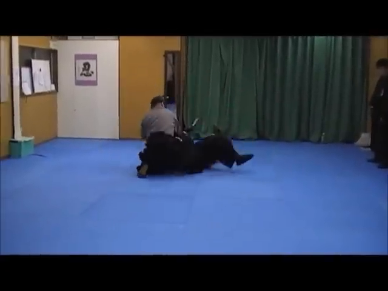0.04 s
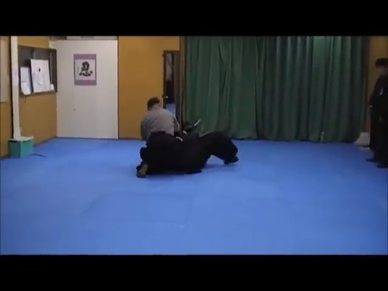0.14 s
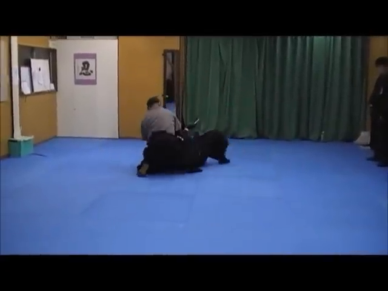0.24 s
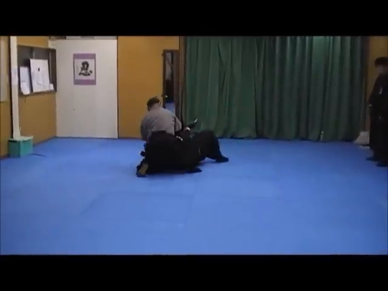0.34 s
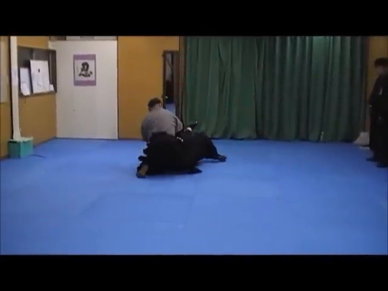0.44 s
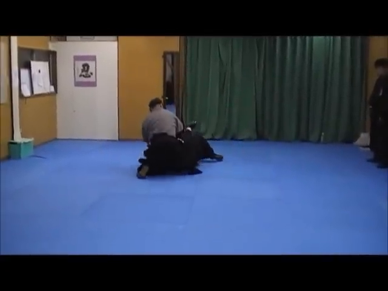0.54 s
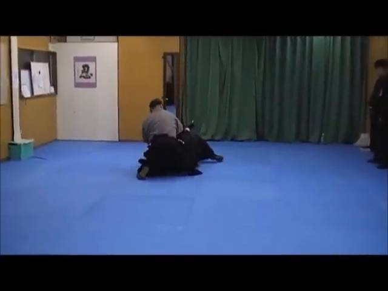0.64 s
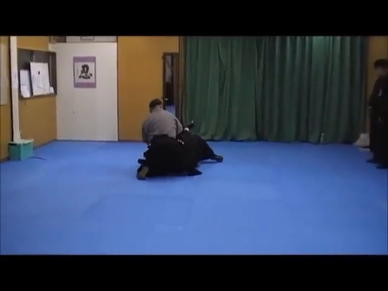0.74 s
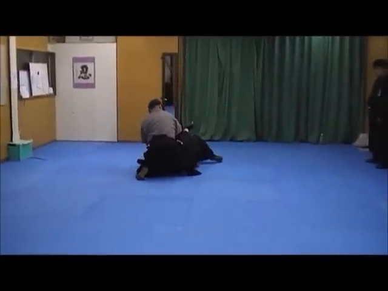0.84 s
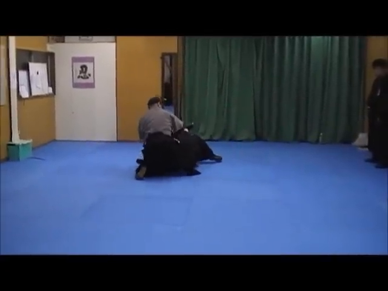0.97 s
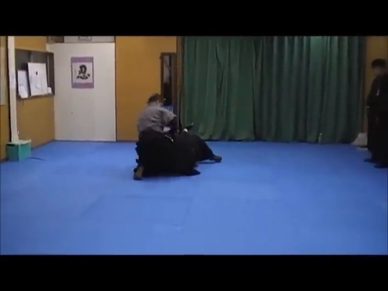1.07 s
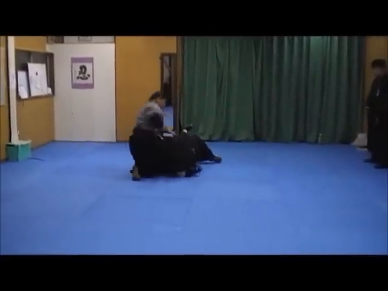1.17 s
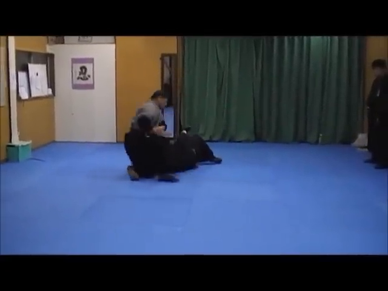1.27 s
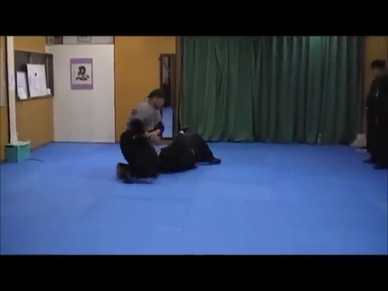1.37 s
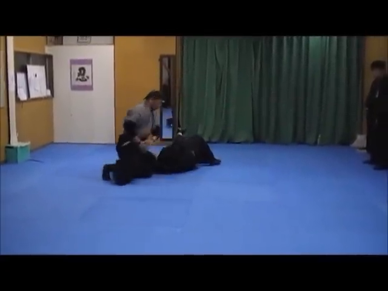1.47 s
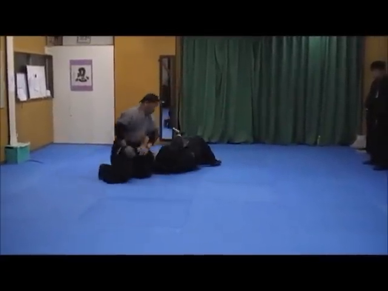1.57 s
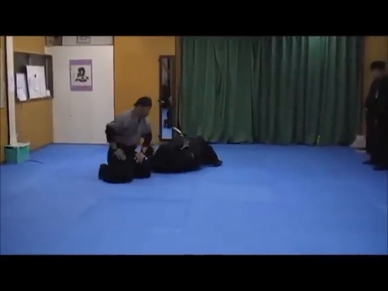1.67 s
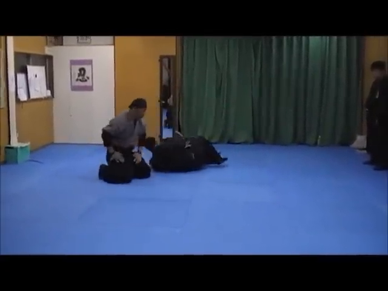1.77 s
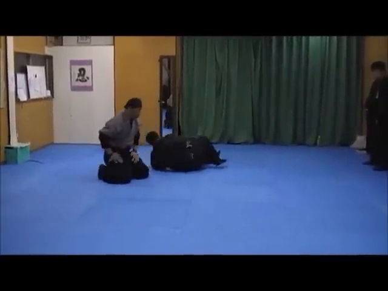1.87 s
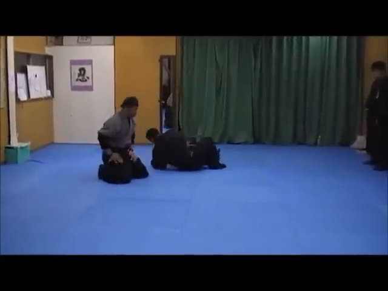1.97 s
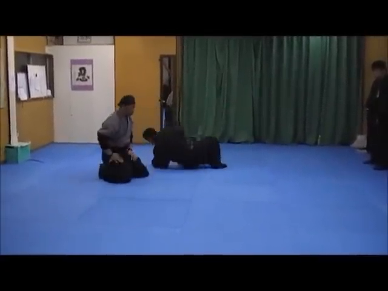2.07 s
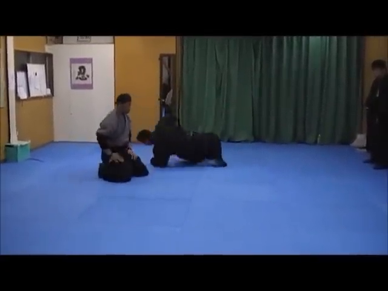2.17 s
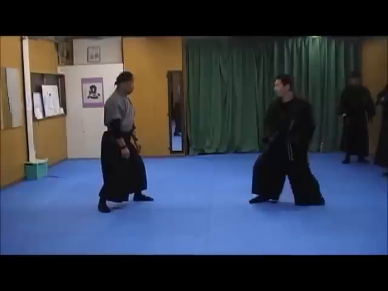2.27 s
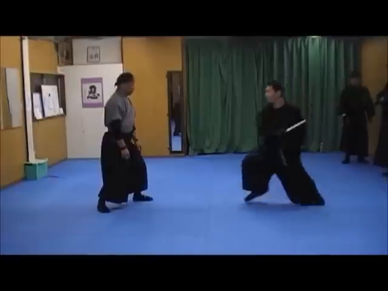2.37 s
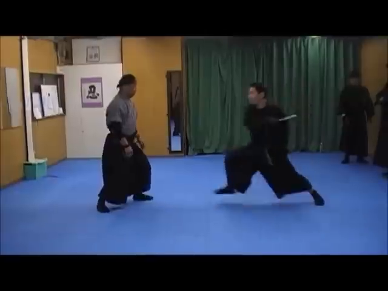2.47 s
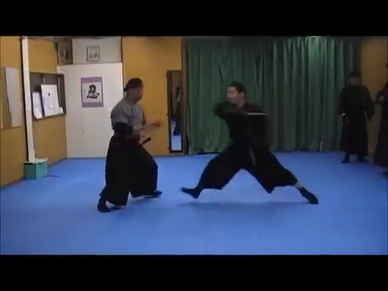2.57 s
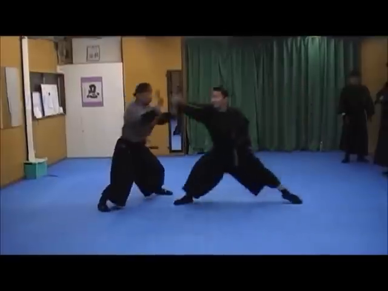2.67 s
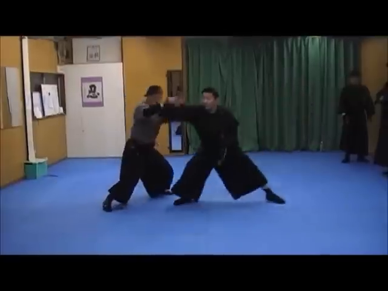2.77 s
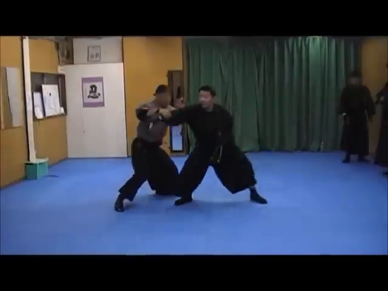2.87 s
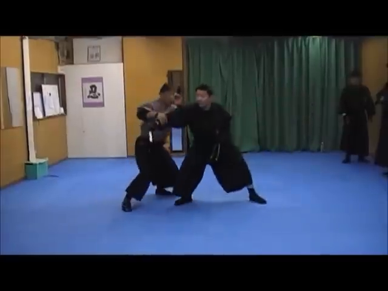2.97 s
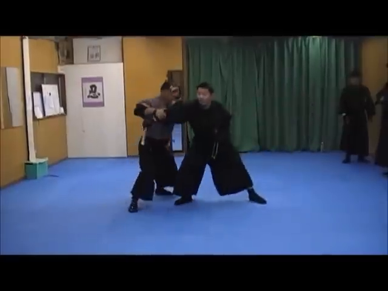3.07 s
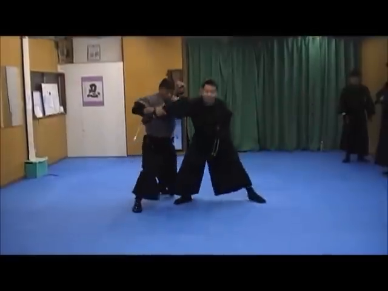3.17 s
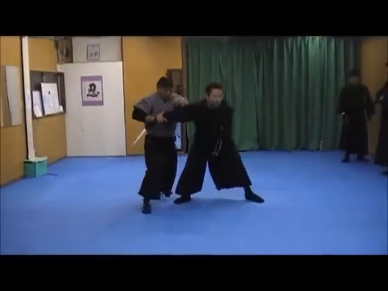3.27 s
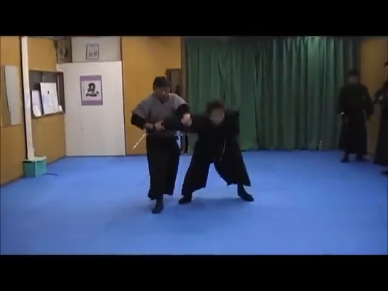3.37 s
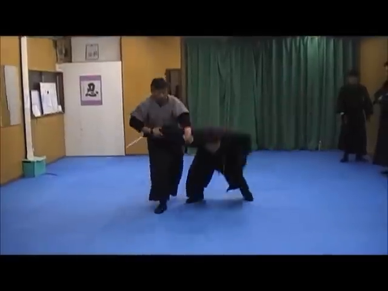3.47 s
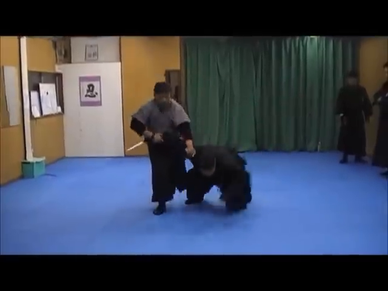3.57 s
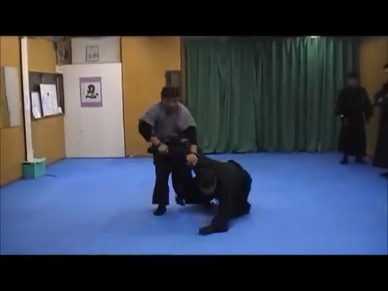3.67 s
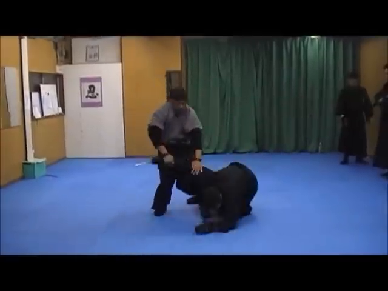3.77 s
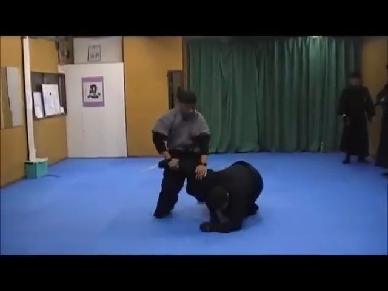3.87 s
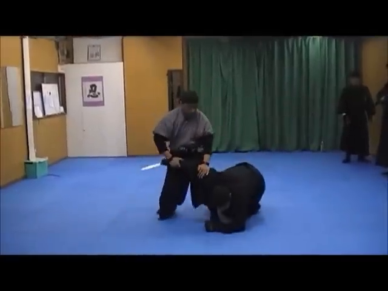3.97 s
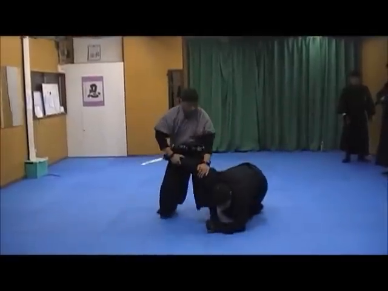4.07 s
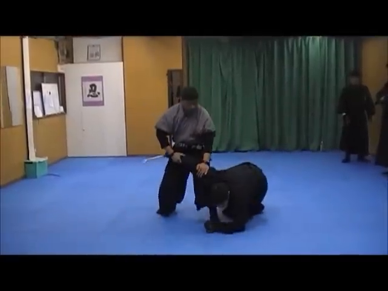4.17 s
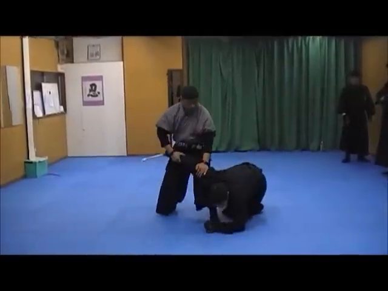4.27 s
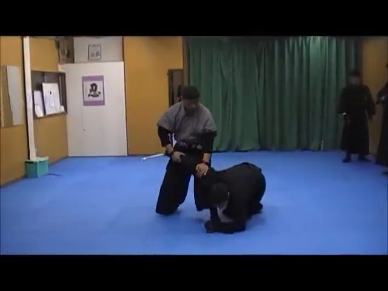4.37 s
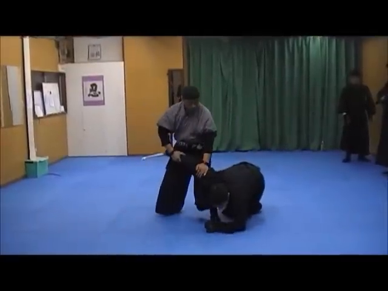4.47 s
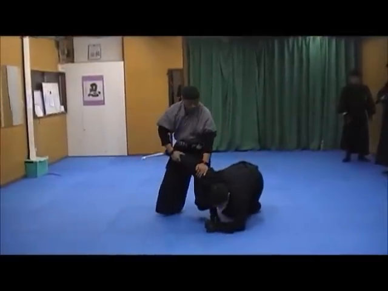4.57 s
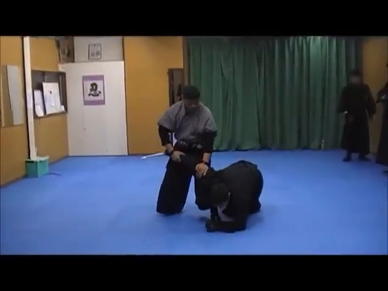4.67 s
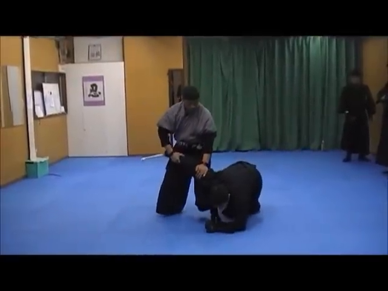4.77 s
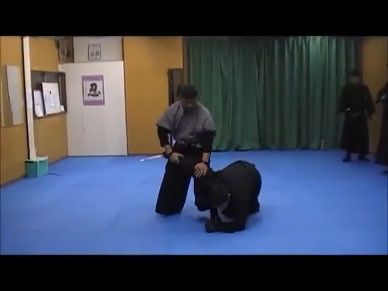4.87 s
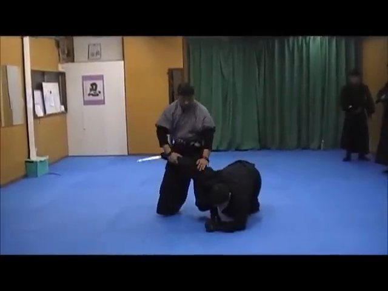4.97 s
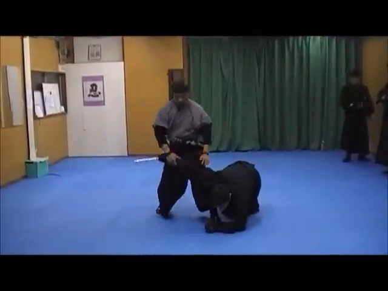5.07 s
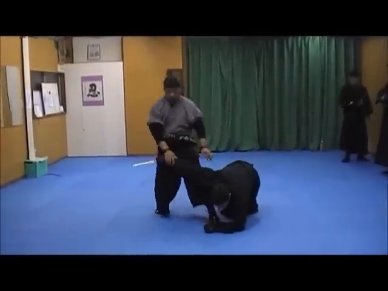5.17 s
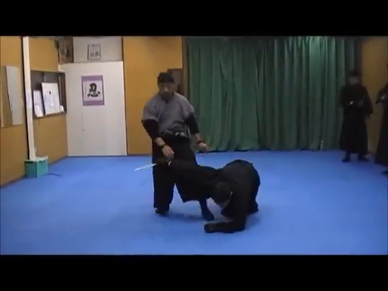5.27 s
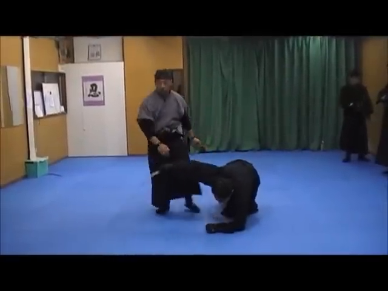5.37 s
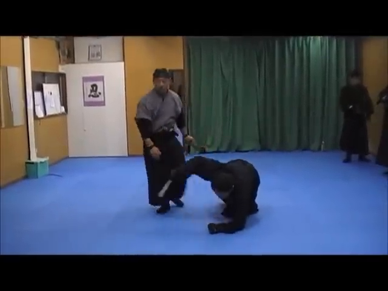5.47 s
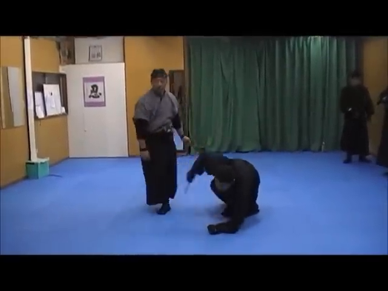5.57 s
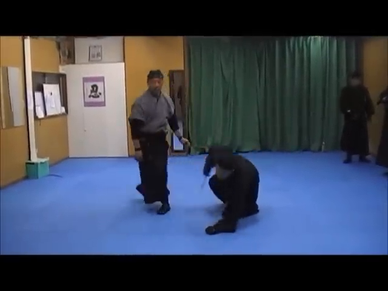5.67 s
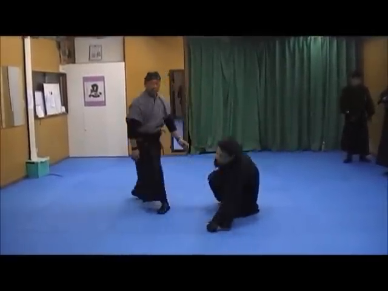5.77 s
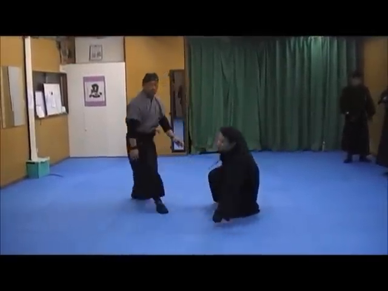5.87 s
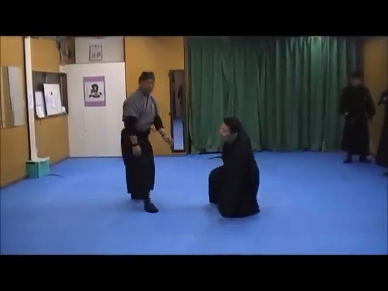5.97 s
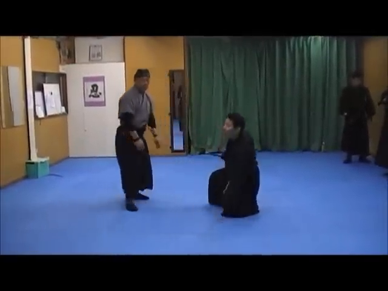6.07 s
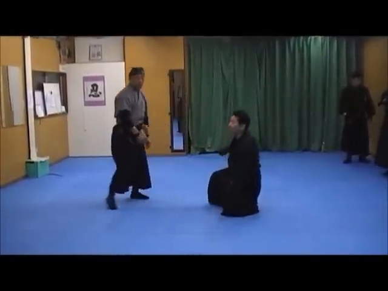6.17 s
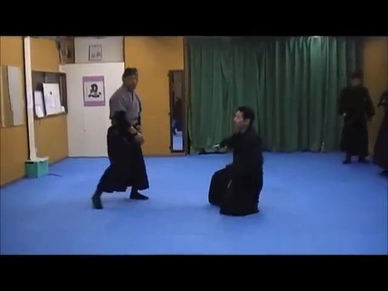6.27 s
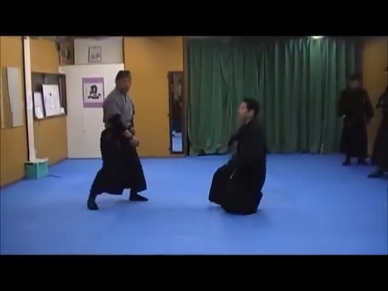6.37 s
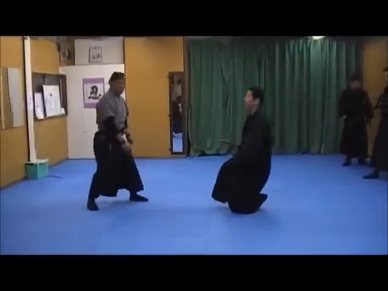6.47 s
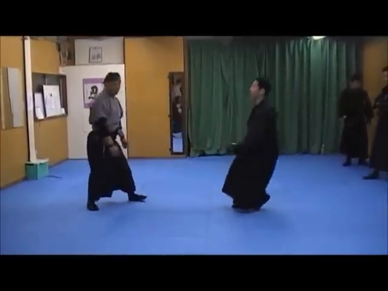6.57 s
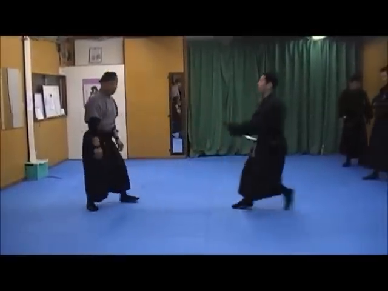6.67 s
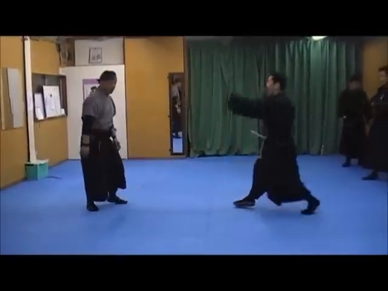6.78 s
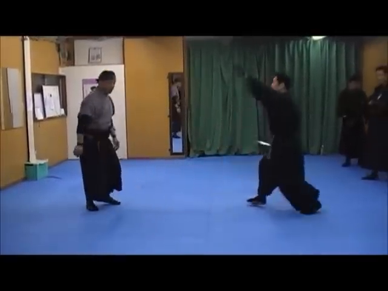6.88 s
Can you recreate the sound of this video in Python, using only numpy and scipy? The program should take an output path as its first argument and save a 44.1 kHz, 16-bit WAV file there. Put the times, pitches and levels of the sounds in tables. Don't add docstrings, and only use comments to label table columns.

```python
import sys
import numpy as np
from scipy import signal
from scipy.fft import rfft, irfft, next_fast_len
from scipy.io import wavfile
from scipy.ndimage import uniform_filter1d

SR = 44100
rng = np.random.default_rng(int(sys.argv[2]) if len(sys.argv) > 2 else 0)


def volts(x):
    e = np.asarray(x, float) / 20
    return 10 ** e


def to_wav(s):
    ch = np.atleast_2d(s).T
    pcm = np.round(np.clip(ch, -1, 1) * 32767)
    wavfile.write(sys.argv[1], SR, pcm.astype(np.int16))


N = 305155
CUT_S = 2.328
GRAIN = 128

# [pitch_hz, level_db per Hz]
CLOTH_SPECTRUM = [(410, -35), (700, -11.5), (766, -7), (1050, -10), (1290, -3.5), (1500, -8), (1670, -4),
                  (5940, -5), (8650, -3), (11800, -13), (15500, -30)]


def evened(x):
    return x / np.sqrt(np.mean(x ** 2) + 1e-20)


def read(points, hz):
    f, value = np.transpose(points)
    return np.interp(np.log(hz + 1), np.log(f + 1), value)


def add(mix, start_s, sound):
    part = mix[round(start_s * SR):][:len(sound)]
    part += sound[:len(part)]


def colour(points, modes=()):
    hz = np.fft.rfftfreq(16384, 1 / SR)
    below = [(1, -80), (points[0][0] * .6, -50)]
    above = [(points[-1][0] * 1.6, -70)]
    gain = volts(read(below + list(points) + above, hz))
    for mode_hz, width_hz, db in modes:
        gain = gain * (1 + 1.3 * volts(db) / (1 + (2 * (hz - mode_hz) / width_hz) ** 2))
    log_gain = np.log(np.r_[gain, gain[-2:0:-1]])
    phase = -signal.hilbert(log_gain).imag
    taps = np.fft.ifft(np.exp(log_gain + 1j * phase)).real[:8192]
    return taps / np.linalg.norm(taps)


def ports(frames, shape, size):
    # [pitch_hz, likeness 0-1]
    likeness = [(30, .8), (60, .86), (125, .95), (250, .975), (500, .95), (1000, .82), (2000, .76),
                (4000, .8), (8000, .33), (15000, .3)]
    # [pitch_hz, left minus right level_db]
    balance = [(30, 2), (60, .9), (125, 0), (1000, 0), (2000, 1.5), (4000, -.3), (8000, -.7), (12000, 0)]
    hz = np.fft.rfftfreq(size, 1 / SR)
    a, b, c, d = rng.standard_normal((frames, len(hz), 4)).T
    same = np.clip(read(likeness, hz), 0, 1)[:, None]
    turn = volts(read(balance, hz) / 2)[:, None]
    shared = a + 1j * b
    right = same * shared + np.sqrt(1 - same ** 2) * (c + 1j * d)
    field = np.array([shared * turn, right / turn])
    field = field * shape(hz[:, None], np.arange(frames) * size / 4 / SR)
    return signal.istft(field, nperseg=size, noverlap=size * 3 // 4)[1]


def landings():
    # [start_s, slap level_db, boom level_db, crack level_db]
    falls = [(.009, -9, -18, -22), (.013, -0.5, -13.5, -28), (.04, -13, -10, -29.5), (.057, -9.5, -16, -29),
             (.115, -12, -17.5, -26.5), (.19, -24.5, -18.5, -41), (.516, -4.5, -16.5, -19),
             (.559, -12, -12, -22), (2.721, -16.5, -23, -25.5), (2.751, -11, -11, -17.5),
             (2.808, -24, -13.5, -27), (2.839, -26, -24.5, -34), (2.901, -28, -31, -31),
             (3.526, -32, -36, -38), (3.727, -15, -25, -20), (3.761, -8, -15, -15),
             (3.794, -11, -12.5, -16.5), (3.848, -14.5, -20.5, -26), (3.938, -37, -14, -23),
             (3.99, -18, -29.5, -25.5), (6.645, -40, -40, -47.5), (6.714, -37, -50, -39.5),
             (6.88, -36, -37, -40)]
    # [start_s, slap level_db, crack level_db, contact_s]
    steps = [(.341, -19.5, -31, 0.0069), (1.198, -49, -45, 0.034), (1.317, -36.5, -36, .008),
             (1.795, -32, -40.5, 0.0062), (2.082, -21, -38.5, .02), (2.309, -38, -43, .008),
             (2.373, -36, -61, 0.0055), (2.569, -45, -42.5, .01), (3.7, -30, -35.5, .015),
             (4.269, -38.5, -45, .012), (5.049, -57, -56, 0.011), (5.294, -30, -37, 0.008),
             (5.935, -44, -31.5, .03), (5.972, -29, -26.5, .009), (6.131, -45, -34, 0.047),
             (6.352, -34.5, -44.5, 0.018), (6.614, -36.5, -46.5, .004), (6.845, -30, -39.5, .026)]
    # [start_s, puff level_db, length_s]
    flaps = [
        (.459, -34.5, .0072),
        (1.197, -50.5, 0.036),
        (1.315, -42.5, .015),
        (1.423, -27, .03),
        (2.456, -50, .02),
        (2.808, -30, 0.0099),
        (5.432, -39, .029),
        (5.798, -47, .017),
        (5.935, -38, .03),
        (6.713, -37, .008),
    ]
    rows = []
    for s, slap, boom, crack in falls:
        rows.append((s, slap, boom, crack, crack - 15, .009))
    for s, slap, crack, contact_s in steps:
        rows.append((s, slap, slap - 20.5, crack, crack - 9, contact_s))
    for s, puff, length_s in flaps:
        rows.append((s, puff - 15, puff - 26, puff - 5, puff, length_s))
    return sorted(rows)


def contact(length_s):
    length_s = max(length_s, .002)
    u = np.arange(int(8 * length_s * SR)) / (length_s * SR)
    force = (1 - np.exp(-u * 30)) * np.exp(-u) * rng.standard_normal(len(u))
    return force / np.linalg.norm(force) * np.sqrt(SR / 20)


def push(length_s):
    u = np.arange(int(10 * length_s * SR)) / (length_s * SR)
    return u * np.exp(-u) / (length_s * SR) * np.sqrt(SR / 20)


def blows():
    # [pitch_hz, level_db per Hz]
    slap_spectrum = [(110, -26), (180, -6), (273, -3), (415, -4), (560, -7), (860, -11.5), (1020, -25),
                     (1980, -120)]
    # [pitch_hz, level_db per Hz]
    boom_spectrum = [(15, -51), (25, -23.5), (45, -15.5), (92, -3), (176, 0.5), (237, -13.5), (314, -1.5),
                     (340, -33.5), (373, -9), (400, -25.5), (520, -16), (880, -120)]
    # [pitch_hz, width_hz, level_db]
    floor_modes = [(59.8, 24, 16), (93, 32, -9.5), (109.7, 7.2, 2), (154, 29, -4)]
    # [pitch_hz, level_db per Hz]
    crack_spectrum = [(470, -32.5), (800, -2.5), (1320, -8), (1620, -7.5), (1760, -10), (2290, -11.5),
                      (2430, -19), (5000, -26), (6500, -55), (11000, -120)]
    slap, boom, crack, puff = np.zeros((4, 4, N))
    for k, (s, slap_db, boom_db, crack_db, puff_db, contact_s) in enumerate(landings()):
        spot = k % 4
        add(slap[spot], s, volts(slap_db - 12.0) * contact(contact_s))
        add(boom[spot], s, volts(boom_db - 1.5) * push(0.061 * contact_s))
        add(crack[spot], s, volts(crack_db - 6.5) * contact(0.41 * contact_s))
        add(puff[spot], s, volts(puff_db - 3.0) * contact(contact_s))
    bodies = [(slap, colour(slap_spectrum)), (boom, colour(boom_spectrum, floor_modes)),
              (crack, colour(crack_spectrum)), (puff, colour(CLOTH_SPECTRUM))]
    size = next_fast_len(N + 8192)
    return irfft(sum(rfft(force, size) * rfft(taps, size) for force, taps in bodies), size)[:, :N]


def hall(x, direct):
    # [pitch_hz, time to fall 60 dB_s]
    ring = [(40, .9), (120, .8), (400, .68), (1500, .58), (4000, .55), (12000, .43)]

    def decay(hz, t):
        bass_build = 1 - np.exp(-t * hz / 1.9)
        return volts(-60 * t / read(ring, hz)) * bass_build

    tail = ports(SR // 128, decay, size=512)
    t = np.arange(tail.shape[1]) / SR
    early = 1 + .9 * np.exp(-t / .05)
    tail = tail * np.minimum(t / .003, 1) * early
    tail = tail / np.linalg.norm(tail[0])
    tail[:, 0] = direct
    return signal.fftconvolve(x[None], tail, axes=1)[:, :len(x)]


def strokes(rows, fade_db_per_s, rest_db):
    t = np.arange(0, N + GRAIN, GRAIN) / SR
    top, db, swell, hold = np.transpose(rows)[:, :, None]
    rise_db = 20 * np.maximum(top - t, 0) / swell
    fall_db = fade_db_per_s * np.maximum(t - top - hold, 0)
    same_scene = (t < CUT_S) == (top < CUT_S)
    power = volts(rest_db) ** 2 + (volts(db - rise_db - fall_db) ** 2 * same_scene).sum(axis=0)
    return np.interp(np.arange(N) / SR, t, np.sqrt(power))


def rub(spectrum, flicker_db, patchy_db):
    frames = N // GRAIN + 8
    flicker = evened(uniform_filter1d(rng.standard_normal(frames), size=4))
    patches = uniform_filter1d(rng.standard_normal((frames, 257)), size=12, axis=0)
    patches = evened(uniform_filter1d(patches, size=6, axis=1)).T

    def shape(hz, t):
        return volts(read(spectrum, hz) + flicker_db * flicker + patchy_db * patches)

    return evened(ports(frames, shape, size=4 * GRAIN)[:, :N])


def moves():
    # [top_s, level_db, swell time for 20 dB_s, hold_s]
    rustles = [(0, -35.5, .05, .001), (.39, -40.5, 0.34, .12), (.62, -44, .2, .005),
               (1.24, -55, 0.55, .005), (1.47, -31.5, 0.07, .15), (1.86, -49, 0.5, 0.077),
               (2.14, -53, 1.5, 0.21), (2.55, -51.5, .5, .05), (2.73, -32, 0.17, .13),
               (2.92, -36.5, 0.5, 0.074), (3.25, -42.5, .5, .1), (3.5, -36, .5, 0.073),
               (3.89, -38, 0.23, 0.067), (4.3, -52.5, 0.6, 0.027), (5.1, -59, 0.3, 0.53),
               (5.83, -54, .8, .01), (5.98, -43, .25, .1), (6.36, -46.5, 0.3, 0.083),
               (6.76, -45.5, 0.27, 0.0091), (6.92, -39, 0.2, .01)]
    # [top_s, level_db, swell time for 20 dB_s, hold_s]
    drags = [(.05, -29, 0.4, 0.027), (.39, -32, 0.1, .01), (.58, -30.5, 0.04, 0.081),
             (1.33, -41.5, .12, .01), (1.57, -38.5, .12, .17), (2.14, -45, 0.73, 0.11),
             (2.51, -45.5, .27, .13), (2.82, -27.5, .2, 0.023), (3.44, -40.5, 0.24, .1),
             (3.78, -39, .5, .01), (3.94, -33, 0.02, .01), (4.2, -49.5, 2, .05), (5.46, -53, 0.83, .3),
             (5.98, -43.5, 0.32, .15), (6.28, -48.5, .5, .1), (6.87, -44, 0.47, .1)]
    # [pitch_hz, level_db per Hz]
    drag_spectrum = [(35, -31), (60, -20), (205, 7.5), (275, 0.5), (565, -1.5), (759, -2), (1350, -7.5),
                     (1530, -5.5), (3000, -16), (3900, -44.5), (6600, -120)]
    shut = [(20, -90)]
    cloth = rub(shut + list(CLOTH_SPECTRUM), flicker_db=.9, patchy_db=1.2)
    limbs = rub(shut + list(drag_spectrum) + [(6000, -66)], flicker_db=0.5, patchy_db=0.5)
    cloth = cloth * strokes(rustles, fade_db_per_s=91, rest_db=-69)
    return cloth + limbs * strokes(drags, fade_db_per_s=110, rest_db=-60.5)


def background():
    # [pitch_hz, level_db per Hz]
    hiss_spectrum = [(15, -54), (25, -30), (64, 1.5), (99, -15), (136, 6), (169, -17), (204, -10),
                     (871, -32), (1050, -8.5), (1270, -36.5), (2230, -23), (2840, -22.5), (15500, -47)]
    # [pitch_hz, level_db]
    whine_lines = [(145.3, -71), (1023, -88), (1082, -84), (1443, -82), (2164, -70.5), (2272, -83.5),
                   (7230, -95.5)]
    hiss = ports(N // 512 + 8, lambda hz, t: volts(read(hiss_spectrum, hz)) + 0 * t, size=2048)
    hiss = volts(-58 - 1.5) * evened(hiss[:, :N])
    t = np.arange(N) / SR
    waver = evened(uniform_filter1d(rng.standard_normal(N), size=4000)).cumsum() / SR
    t = t + 0.0008 * waver
    return hiss + sum(volts(db - 2.0) * np.sin(2 * np.pi * hz * t) for hz, db in whine_lines)


def squeak(start_s, level_db, slip_hz, length_s, step_db):
    u = np.arange(int(length_s * SR)) / (length_s * SR)
    unsteady = uniform_filter1d(rng.standard_normal((2, SR // 4)), size=120)
    drift, flutter = unsteady[:, :len(u)] * np.sqrt(120)
    wobble = .0036 * abs(step_db) * (slip_hz / 1500) ** .35
    glide = -0.044 * (u - .5)
    turns = np.cumsum(slip_hz * (1 + glide + wobble * drift)) / SR
    stack = 0
    for k in range(6):
        harmonic_db = step_db * k - 22 * ((k + 1) * slip_hz > 3600)
        stack = stack + volts(harmonic_db) * np.sin(2 * np.pi * (k + 1) * turns)
    throb = 1 - .3 * np.cos(2 * np.pi * turns / 14.64)
    ends = np.minimum(1, np.minimum(u, 1 - u) * length_s / 0.0055)
    return volts(level_db + 2.0 + 2 * flutter) * throb * stack * ends


def scene():
    # [start_s, level_db, slip rate pitch_hz, length_s, level_db per harmonic]
    sole_slips = [
        (1.422, -19, 1480, 0.0261, -1),
        (1.44, -20, 1531, .088, -13.5),
        (5.432, -45, 1446, .04, -20),
        (5.962, -36, 352, 0.041, -3),
    ]
    # [start_s, level_db, slip rate pitch_hz, length_s, level_db per harmonic]
    mat_slips = [
        (2.082, -35, 194.5, .08, -12),
        (2.569, -37.5, 250, 0.038, -17),
        (6.626, -46.5, 300, .045, -13),
        (6.869, -38, 430, .06, -10),
    ]
    dry_blows = blows()
    soles, mat = np.zeros((2, N))
    for row in sole_slips:
        add(soles, row[0], squeak(*row))
    for row in mat_slips:
        add(mat, row[0], squeak(*row))
    slips = soles + volts(-13.5) * mat
    cut = round(CUT_S * SR)
    parts = slice(0, cut), slice(cut, N)
    thuds = np.hstack([sum(hall(spot[part], direct=0.41) for spot in dry_blows) for part in parts])
    squeaks = np.hstack([hall(slips[part], direct=1.3) for part in parts])
    return thuds + squeaks + mat + moves() + background()


def low_pass(x):
    return signal.sosfilt(signal.butter(12, 15640, fs=SR, output="sos"), x)


def record(dry):
    limited = np.clip(dry, -1, 1)
    return low_pass(limited)


dry = scene()
out = record(dry)
to_wav(out)
```